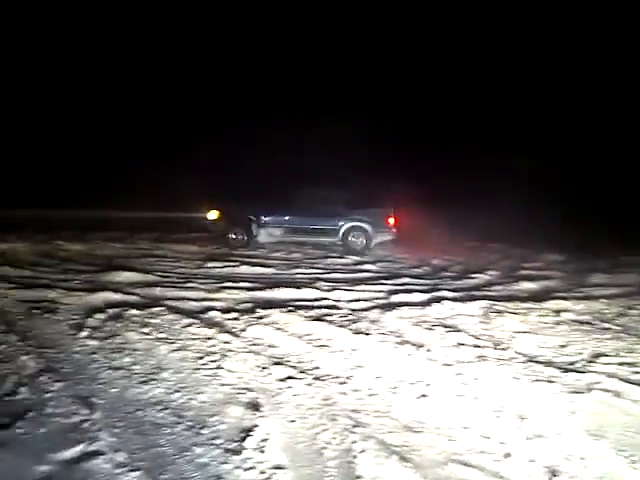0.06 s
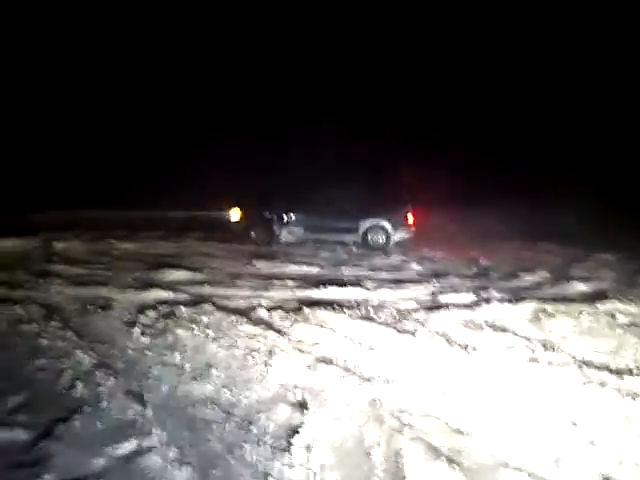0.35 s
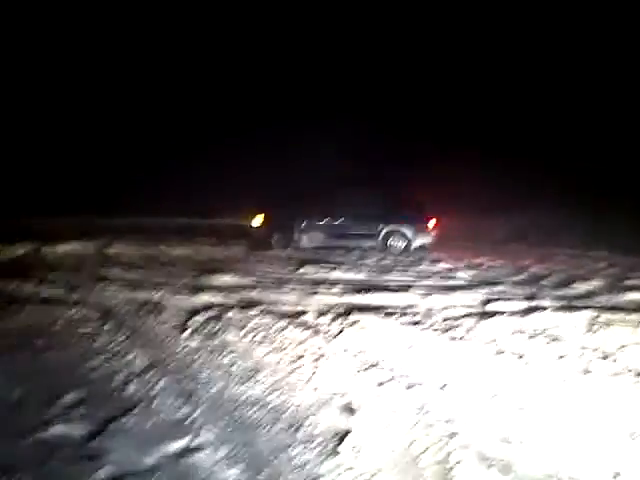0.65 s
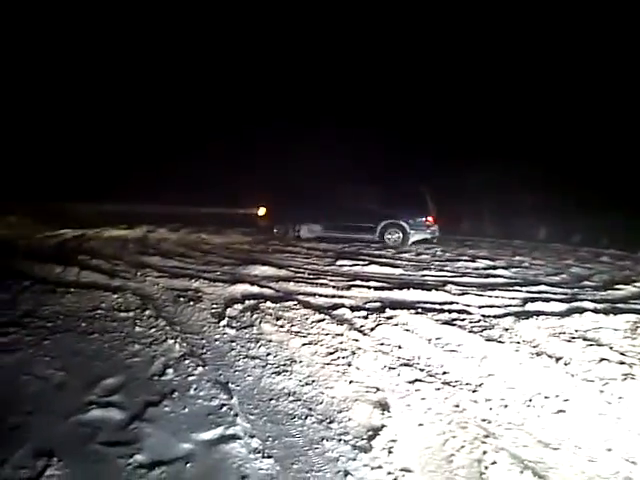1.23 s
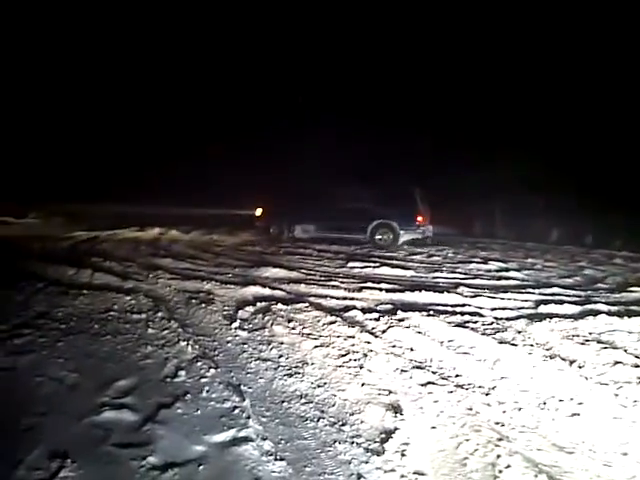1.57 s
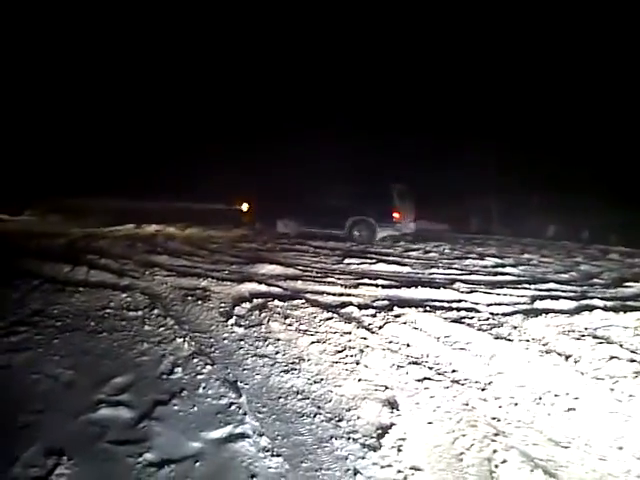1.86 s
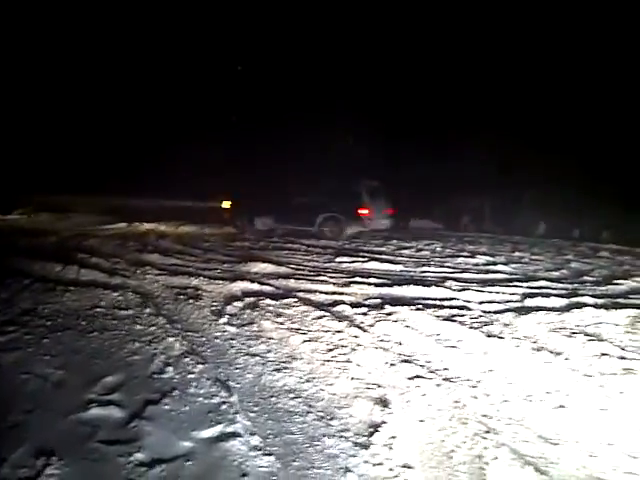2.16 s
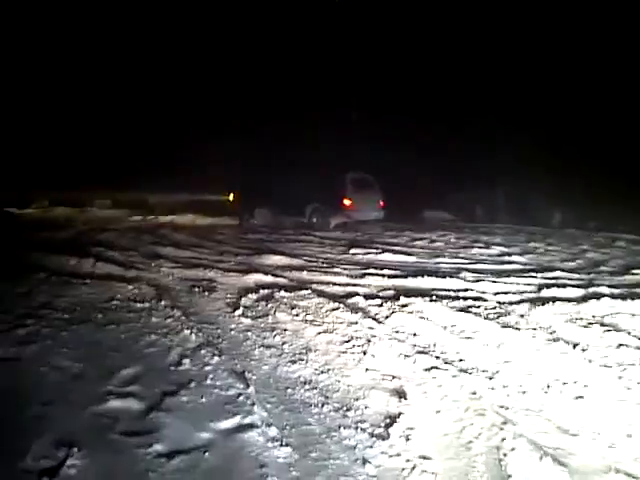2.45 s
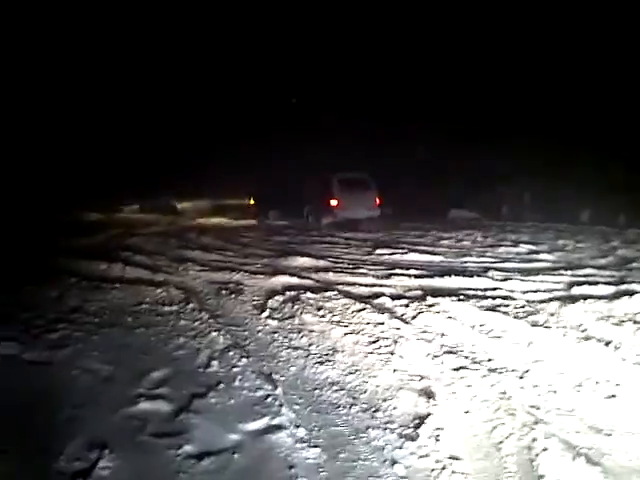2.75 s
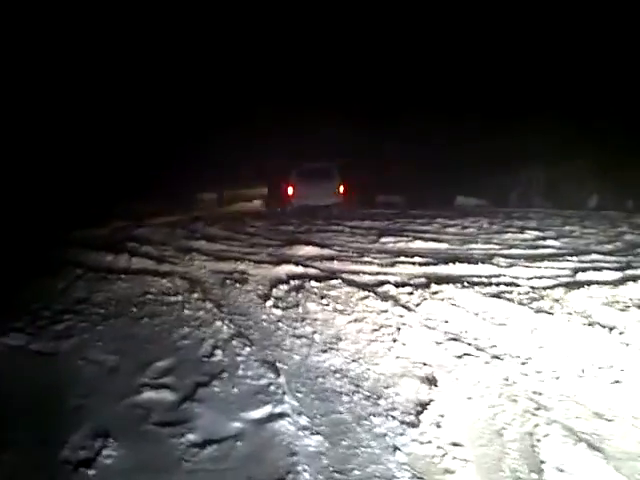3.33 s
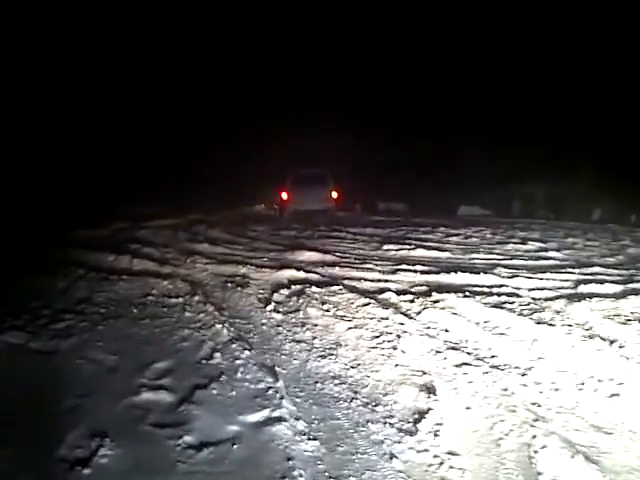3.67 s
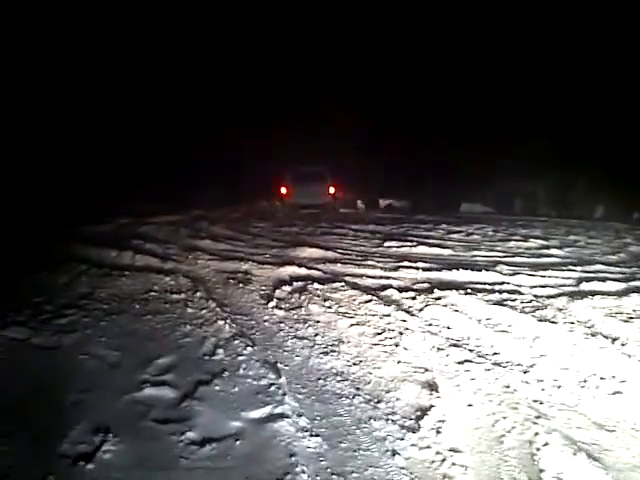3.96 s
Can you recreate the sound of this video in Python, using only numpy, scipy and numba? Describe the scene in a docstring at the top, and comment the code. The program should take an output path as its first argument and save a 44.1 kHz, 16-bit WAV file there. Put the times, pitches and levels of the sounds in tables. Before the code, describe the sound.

A distant pickup rumbles on open snow, its tyres whirring and whining as they slip, then its exhaust drones up and back down. Close by, wind and handling thump on the microphone while icy snow crackles ever more densely.

```python
"""Pickup on a snowy lot at night

The tyres whirr and whine as they slip and throw snow; then the exhaust drones up and down
as the truck turns away, over a low rumble. Close by, buffeting and handling thump on a
hand-held camera's microphone, and icy snow snaps and crackles ever more densely."""
import sys
import numpy as np
from scipy import signal
from scipy.fft import rfft, irfft
from scipy.io import wavfile
from scipy.ndimage import uniform_filter1d
from numba import njit

SR = 44100
rng = np.random.default_rng(int(sys.argv[2]) if len(sys.argv) > 2 else 0)


def master_out(mix):
    """Clip the mix to full scale and print it as 16-bit PCM to the path in sys.argv[1]."""
    frames = np.transpose(np.atleast_2d(mix))
    ceiling = np.clip(frames, -1, 1)
    pcm = np.round(ceiling * 32767).astype(np.int16)
    wavfile.write(sys.argv[1], SR, pcm)


N = 176400  # 4 s


def undb(db):
    """Decibels to gain."""
    return 10 ** (np.asarray(db) / 20)


def unit(x):
    """Scale to rms 1."""
    return x / np.sqrt(np.mean(x ** 2) + 1e-20)


def curve(table, column=1):
    """One column of a time table, interpolated linearly per sample."""
    rows = np.array(table, float)
    return np.interp(np.arange(N) / SR, rows[:, 0], rows[:, column])


def colour(x, points):
    """Minimum-phase filter through (f/Hz, gain/dB) points."""
    rows, size = np.array(points, float), 2 * len(x)
    hz = np.maximum(np.arange(size // 2 + 1) * SR / size, 1)
    gain_db = np.interp(np.log(hz), np.log(rows[:, 0]), rows[:, 1])
    cepstrum = irfft(np.log(undb(gain_db)))
    cepstrum[1:size // 2] *= 2  # fold onto positive time
    cepstrum[size // 2 + 1:] = 0
    return irfft(rfft(x, size) * np.exp(rfft(cepstrum)))[:len(x)]


def hump(centre_hz, octaves):
    """Rounded band as (f/Hz, gain/dB) points, 3 dB down at +/- octaves."""
    hz = np.geomspace(20, 12000, 40)
    offset = np.log2(hz / centre_hz) / octaves
    return np.column_stack([hz, -10 * np.log10(1 + offset ** 4)])


def walk(rate_hz):
    """Smooth random wander, rms 1."""
    hold = max(int(SR / rate_hz), 1)
    steps = rng.standard_normal(1024)
    stairs = steps[np.arange(N) // hold % len(steps)]
    return unit(uniform_filter1d(uniform_filter1d(stairs, hold), hold))


def grains(per_s, spread_db, max_db):
    """Random impulses of either sign: many small, a few large."""
    hit = rng.random(N) < per_s / SR
    size_db = np.minimum(spread_db * rng.exponential(size=N), max_db)
    return hit * np.sign(rng.standard_normal(N)) * undb(size_db)


@njit
def svf(x, hz, width_hz):
    """Moving state-variable band-pass, unity gain at its centre."""
    y, band_state, low_state = np.empty(len(x)), 0., 0.
    for i in range(len(x)):
        g, damping = np.tan(np.pi * hz[i] / SR), width_hz[i] / hz[i]
        band = (band_state + g * (x[i] - low_state)) / (1 + g * (g + damping))
        band_state = 2 * band - band_state
        low_state += 2 * g * band
        y[i] = damping * band
    return y


def noise_band(hz, width_hz):
    """Twice band-passed noise, rms 1; power stays steady as the band moves."""
    hz, width_hz = hz * np.ones(N), width_hz * np.ones(N)
    once = svf(rng.standard_normal(N), hz, width_hz)
    return unit(svf(once, hz, width_hz) / np.sqrt(width_hz))


def exhaust():
    """Distant exhaust: a strong firing tone with weak, uneven partials."""
    # engine revs: t/s, firing rate/Hz, level/dB
    revs = [(0, 62.5, -39), (1.65, 60, -45.5), (1.87, 73.1, -28.5), (2.05, 87, -26.5), (2.17, 96.6, -27.5),
            (2.28, 104.6, -24.5), (2.39, 115.2, -31.5), (2.46, 116.3, -25), (2.58, 119, -28),
            (2.75, 113.9, -26), (3.0, 92, -32.5), (3.12, 84.4, -35), (3.3, 67.5, -45.5), (4.0, 60.8, -68)]
    # partials: multiple of firing rate, level/dB
    orders = [(.5, -19), (1, 1), (1.5, -13.5), (2, -18), (3, -32.5)]
    wobble, flutter_db = .014, 1.3
    firing_hz = curve(revs) * (1 + wobble * walk(24.84))
    phase = 2 * np.pi * np.cumsum(firing_hz) / SR
    tone = np.zeros(N)
    for order, db in orders:
        gain = undb(db + flutter_db * walk(55))
        tone += gain * np.sin(order * phase + 2 * np.pi * rng.random())
    return unit(tone) * undb(curve(revs, column=2))


def rumble():
    """Engine and surroundings: a slightly restless rumble with a faint, rough hum."""
    # rumble spectrum: f/Hz, level/dB
    spectrum = [(20, -17.5), (35, -5.5), (60, -3.5), (105, 4.5), (160, 1.5), (230, -3.5), (345, -9),
                (520, -15), (1000, -21.5), (1400, -25), (2200, -35), (3800, -39), (5500, -60), (7400, -49)]
    # rumble envelope: t/s, level/dB
    envelope = [(0, -33), (.8, -33.5), (1.6, -37.5), (2.4, -33), (2.9, -35), (3.3, -35), (4.0, -36.5)]
    hum_db, wander_db = -53.5, .44
    hum = undb(hum_db) * noise_band(hz=340, width_hz=31)
    noise = unit(colour(rng.standard_normal(N), spectrum))
    return noise * undb(curve(envelope) + wander_db * walk(12)) + hum


def buffeting():
    """Eddies puff dully on the microphone; each size flutters on its own within the gusts."""
    # gusts: t/s, level/dB
    gusts = [(0, -17.5), (.06, -37), (.11, -24.5), (.21, -39.5), (.66, -34.5), (.79, -29.5), (.97, -34.5),
             (1.11, -33.5), (1.32, -27), (1.46, -33), (1.52, -30), (1.63, -34), (1.69, -29), (1.81, -30),
             (1.95, -29), (2.2, -38.5), (2.33, -32.5), (2.7, -44), (3.1, -52.5), (4.0, -42.5)]
    # buffeting colour: f/Hz, gain/dB
    response = [(20, -3), (40, -8.5), (80, -1.5), (160, -1), (300, -7.5), (500, -16.5), (800, -24),
                (1300, -35), (2500, -39), (7000, -70)]
    # eddies, large to small: centre f/Hz, gain/dB
    eddies = [(60, 2), (120, 0.5), (220, 1.5), (400, 0), (750, 2.5), (1600, 0.5)]
    flutter_db = 2.5
    puffs = np.zeros(N)
    for hz, db in eddies:
        impulses = grains(per_s=500, spread_db=3.5, max_db=9)
        puffs += colour(impulses, hump(hz, octaves=.5)) * undb(db + flutter_db * walk(50))
    return unit(colour(puffs, response)) * undb(curve(gusts))


def ice_crackle():
    """Ice grains of several sizes tick in loose clusters, over a faint hiss that swells and fades with them."""
    # crackle envelope: t/s, level/dB
    envelope = [(0, -49.5), (.11, -62.5), (.2, -72), (.3, -64), (.7, -56), (.8, -75), (1.06, -62.5),
                (1.16, -58.5), (1.85, -55.5), (2.05, -62.5), (2.3, -60.5), (2.42, -56.5), (2.81, -51),
                (2.89, -62.5), (3.02, -59.5), (3.08, -57), (3.2, -56.5), (3.45, -53.5), (4.0, -55.5)]
    # crackle colour: f/Hz, gain/dB
    response = [(300, -25.5), (1000, -2.5), (2000, 0), (3000, 3), (3700, 1.5), (5000, -1), (6300, 0.5),
                (7400, -1.5)]
    # grain density: t/s, rate per size/(1/s)
    density = [(0, 70), (2.2, 100), (2.7, 210), (4.0, 210)]
    # grains, coarse to fine: centre f/Hz, gain/dB
    sizes = [(1500, 0), (2700, 6), (4500, -0.5), (6000, -2.5)]
    cluster_db, smear_s, hiss_db = 1.5, .0003, -10
    clusters = undb(cluster_db * walk(45))
    pole, per_s = np.exp(-1 / (SR * smear_s)), curve(density)
    crackle = np.zeros(N)
    for hz, db in sizes:
        ticks = grains(per_s, spread_db=7, max_db=17.5) / np.sqrt(per_s)  # denser, not louder
        energy = signal.lfilter([1], [1, -pole], ticks ** 2)
        crumbs = np.sqrt(energy) * rng.standard_normal(N)
        crackle += undb(db) * colour(crumbs, hump(hz, octaves=.66))
    crackle = unit(colour(crackle * clusters, response))
    hiss = unit(colour(rng.standard_normal(N), hump(2800, octaves=.59)))
    return (crackle + undb(hiss_db) * hiss) * undb(curve(envelope))


def handling_thumps():
    """Knocks and gusts on the camera body: a few cycles of a low note with a little scuff."""
    # thumps: t/s, envelope peak/dB, f/Hz, ring/cycles
    knocks = [(.036, -26, 704, 2.3), (.088, -24, 150, 2.2), (0.11, -22.5, 410, 1.9),
              (.303, -22.5, 170, 1.6), (.354, -22, 198, 1.3), (.404, -26, 168, 0.78), (.494, -20, 110, 2.3),
              (0.581, -12, 198, 1.43), (.773, -22.5, 190, 1.6), (.815, -24, 169, 1.3),
              (1.182, -19, 320, 1.3), (1.205, -28, 475, 3), (1.276, -21, 121.5, 1.6), (1.287, -24, 310, 3),
              (1.298, -20.5, 176, 4.5), (1.348, -22.5, 396, 4.4), (1.354, -26, 616, 3.7),
              (1.385, -18, 148, 1.4), (1.388, -21.5, 361, 2.9), (1.433, -21.5, 212, 2),
              (1.513, -21, 119, 2.4), (1.532, -24.5, 356, 2.4), (1.565, -25, 220, 1.8),
              (1.669, -21.5, 220, 1.4), (1.683, -13, 177, 1.5), (1.702, -13.5, 160, 1.3),
              (1.72, -22, 85, 2.5), (1.771, -19, 243, 2.8), (1.873, -19.5, 230, 1.24),
              (1.904, -19, 195, 0.99), (1.940, -16.5, 237, 1.2), (1.959, -22.5, 407, 4.2),
              (2.003, -17.5, 178, 1.2), (2.015, -21, 206, 1.3), (2.081, -24.5, 340, 0.58),
              (2.128, -24, 290, 2.2), (2.203, -23, 330, 1.3), (2.284, -21.5, 190, 1.4),
              (2.333, -17.5, 221, 0.9), (2.464, -16.5, 144.5, 1.3), (2.582, -24.5, 170, 1.5),
              (2.978, -23, 195, 1.3), (3.168, -29.5, 280, 1.5), (3.345, -25.5, 110, 1.04),
              (3.482, -23, 165, 1.43), (3.555, -25, 228, 0.67), (3.570, -28, 177, 1.1),
              (3.737, -25.5, 162, 1.4), (3.837, -18, 172, 1.8)]
    # scuff spectrum: f/Hz, level/dB
    scuff_spectrum = [(60, -9.5), (280, 1.5), (600, -9), (1100, -18.5), (4000, -51.5)]
    rise_cycles, scuff_db = .22, -15
    out, t = np.zeros(N), np.arange(-1024, 3072) / SR
    for at_s, db, hz, ring_cycles in knocks:
        cycles = t * hz
        rise = np.exp(-(cycles / rise_cycles) ** 2 / 2)
        fall = np.exp(-(cycles / ring_cycles) ** 2)
        envelope = undb(db) * np.where(cycles < 0, rise, fall)
        scuff = undb(scuff_db) * unit(colour(rng.standard_normal(len(t)), scuff_spectrum))
        add(out, at_s + t[0], envelope * (np.sin(2 * np.pi * cycles) + scuff))
    return out


def add(out, start_s, sound):
    """Mix a short sound in at start_s."""
    at = int(round(start_s * SR)) + np.arange(len(sound))
    inside = (at >= 0) & (at < N)
    out[at[inside]] += sound[inside]


def crust_cracks():
    """Icy crust snaps nearby: a click and a brief crumbling tail, each around its own pitch."""
    # cracks: t/s, peak/dB, centre f/Hz
    cracks = [(.088, -39, 4000), (.110, -29, 1000), (.118, -39, 4200), (.302, -37, 3500), (.440, -27, 1900),
              (.483, -22, 950), (.583, -27, 1000), (.591, -27, 3500), (.689, -27.5, 1700),
              (.736, -29, 3200), (1.035, -31, 4600), (1.238, -33, 3200), (1.261, -31, 2500),
              (1.339, -31, 4200), (1.593, -34, 4600), (1.645, -34, 4400), (1.768, -33, 4200),
              (1.858, -38, 4600), (2.008, -33, 4600), (2.091, -37, 4000), (2.373, -20.5, 3100),
              (2.411, -36, 3500), (2.422, -34, 3600), (2.469, -35, 3400), (2.528, -35, 3600),
              (2.631, -33, 4400), (2.656, -35, 3300), (2.711, -34, 2600), (2.782, -28, 3600),
              (2.814, -27, 1800), (2.833, -32, 3400), (3.048, -35, 4200), (3.066, -36, 3000),
              (3.120, -28, 2200), (3.263, -29, 1800), (3.328, -24.5, 1550), (3.405, -35, 3600),
              (3.431, -33, 3200), (3.442, -32, 2000), (3.473, -23.5, 1500), (3.477, -26, 1100),
              (3.527, -30, 4600), (3.529, -30, 1300), (3.603, -26.5, 1700), (3.659, -34, 3100),
              (3.671, -36, 3700), (3.704, -35, 3100), (3.767, -32, 3200), (3.798, -23, 2000),
              (3.803, -28, 1900), (3.813, -30, 3400), (3.887, -32, 2200), (3.902, -27, 2000),
              (3.910, -32, 2400)]
    tail_s, tail_db, skirt_db = .002, -19, 9
    out, t = np.zeros(N), np.arange(2048) / SR
    hz = np.geomspace(100, 12000, 30)
    for at_s, db, centre_hz in cracks:
        burst = rng.standard_normal(len(t)) * undb(tail_db) * np.exp(-t / tail_s)
        burst[0] += 1  # click
        body_db = -skirt_db * np.abs(np.log2(hz / centre_hz)) ** 1.5
        snap = colour(burst, np.column_stack([hz, body_db]))
        add(out, at_s, undb(db) * snap / np.abs(snap).max())
    return out


def tyres():
    """Slipping tread rubs the snow: a wavering whine, a broad whirr and a hiss of thrown snow."""
    # slip whirr: t/s, f/Hz, level/dB, width/Hz
    slip = [(0, 1550, -71.5, 288), (.19, 1623, -64, 253), (.3, 1600, -49.5, 263), (.43, 1526, -45, 255),
            (.53, 1574, -51.5, 280), (.8, 1560, -47, 373), (1.0, 1597, -47.5, 460), (1.3, 1570, -54.5, 478),
            (1.9, 1550, -59, 588), (2.42, 1730, -52.5, 720), (2.9, 1620, -63, 630), (4.0, 1487, -55.5, 701)]
    # whirr resonances: multiple of f, multiple of width, level/dB
    resonances = [(0.829, 1.1, -6.5), (1.0, 1.0, -3.5)]
    # thrown snow: t/s, centre f/Hz, level/dB
    snow = [(.15, 2530, -76), (.33, 2390, -52), (.43, 2380, -52), (.52, 2350, -61), (.66, 2265, -57),
            (.8, 2120, -52.5), (.98, 2216, -52.5), (1.15, 2130, -62), (1.4, 2094, -76), (4.0, 2290, -63.5)]
    # whine of the spinning tread: t/s, f/Hz, level/dB
    tread = [(.2, 1620, -70), (.28, 1585, -47), (.46, 1514, -48.5), (.55, 1585, -51), (.75, 1757, -47.5),
             (.88, 1720, -55.5), (1.0, 1740, -50.5), (1.15, 1700, -73), (1.3, 1740, -85)]
    whine_wobble, whine_flutter_db, whirr_flutter_db = .025, 3.5, 1.5
    hz, width_hz = curve(slip), curve(slip, column=3)
    bands = sum(undb(db) * noise_band(k * hz, widen * width_hz) for k, widen, db in resonances)
    spray = noise_band(curve(snow), width_hz=580) * undb(curve(snow, column=2))
    whine_hz = curve(tread) * (1 + whine_wobble * walk(220))
    whine = np.sin(2 * np.pi * np.cumsum(whine_hz) / SR)
    whine *= undb(curve(tread, column=2) + whine_flutter_db * walk(90))
    whirr = unit(bands) * undb(curve(slip, column=2) + whirr_flutter_db * walk(60))
    return whirr + spray + whine


def scene():
    """Distant truck, noises on the microphone and nearby snow, in mono."""
    distant = exhaust() + rumble() + tyres()
    close = buffeting() + handling_thumps() + crust_cracks() + ice_crackle()
    return (distant + close)[None, :]


def record(dry):
    """The camera colours the sound, rolls the treble off and then cuts it steeply."""
    # microphone response: f/Hz, gain/dB
    response = [(20, 5.5), (60, -0.5), (1500, 0.5), (2800, 0.5), (3700, -4), (5000, 2), (6000, 0),
                (7400, -3)]
    rolloff_hz, cutoff_hz = 6900, 7450
    rolloff = signal.butter(10, rolloff_hz, fs=SR, output="sos")
    cutoff = signal.ellip(12, .3, 80, cutoff_hz, fs=SR, output="sos")
    heard = colour(dry[0], response)[None, :]
    return signal.sosfilt(cutoff, signal.sosfilt(rolloff, heard))


dry = scene()
out = record(dry)
master_out(out)
```